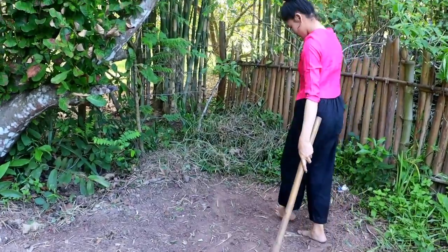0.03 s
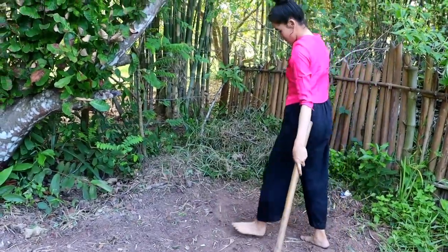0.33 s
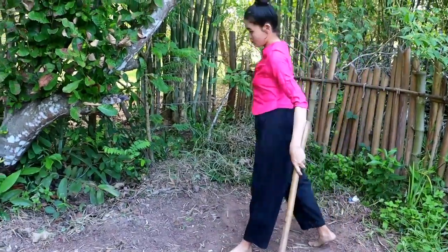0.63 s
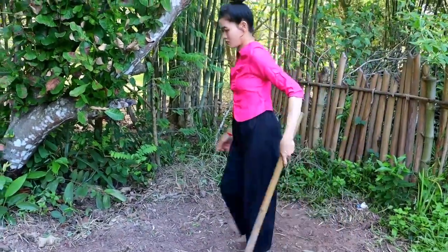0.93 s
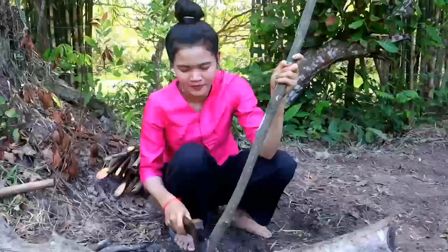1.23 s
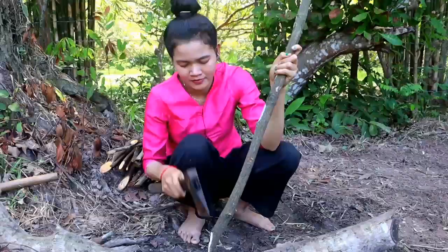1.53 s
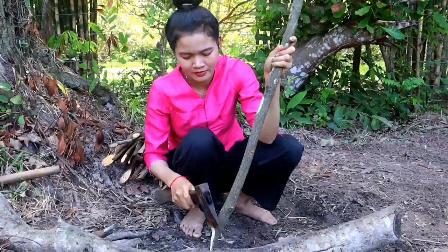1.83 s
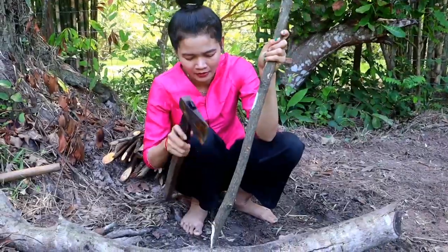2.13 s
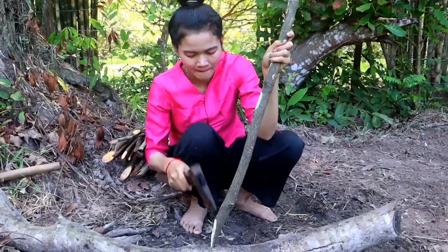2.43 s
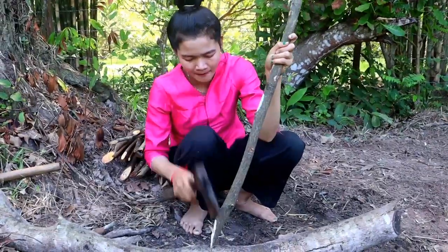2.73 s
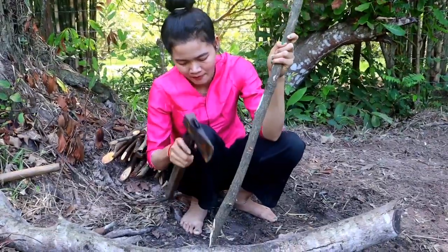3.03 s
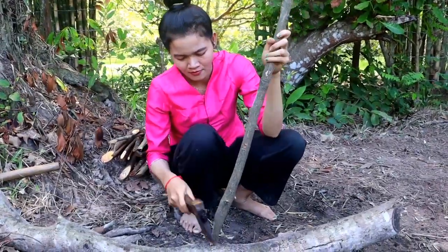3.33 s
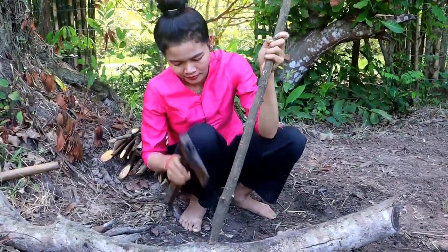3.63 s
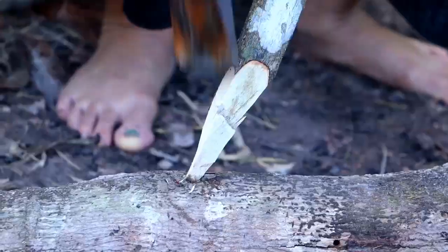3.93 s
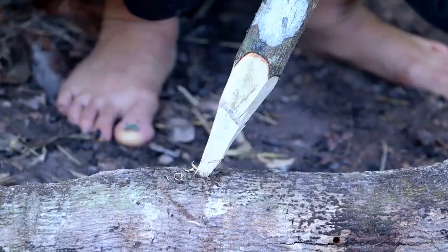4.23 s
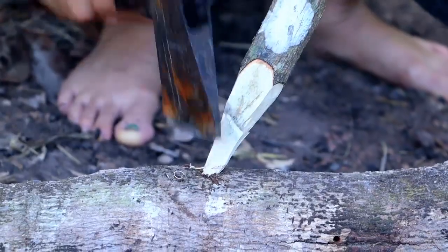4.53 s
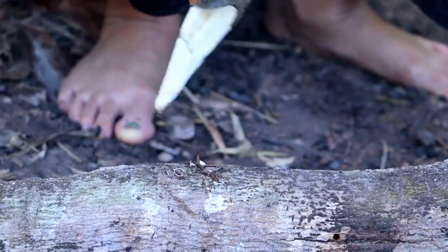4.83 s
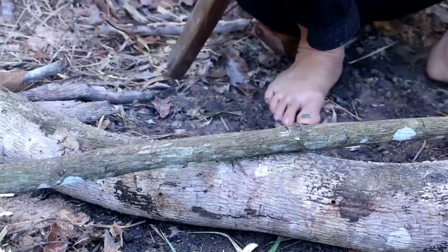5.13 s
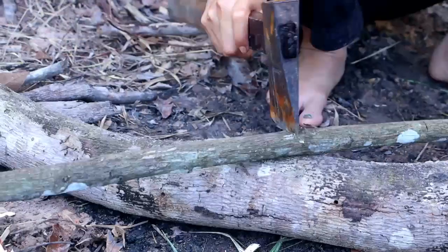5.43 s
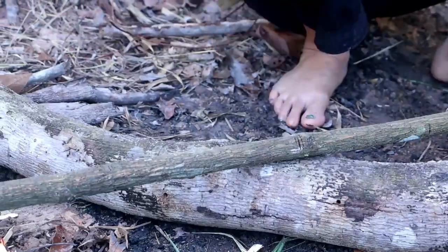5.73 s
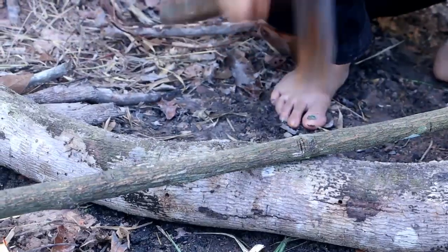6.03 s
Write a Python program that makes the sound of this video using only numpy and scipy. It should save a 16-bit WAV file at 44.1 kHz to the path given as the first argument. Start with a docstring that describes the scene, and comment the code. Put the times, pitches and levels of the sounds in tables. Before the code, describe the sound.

A hatchet chops a green stick against a log in regular sharp, thudding strokes, with faint birds and insects outdoors.

```python
"""A yard among trees: a hatchet points a green stake on a log, then chops a branch laid across it. Each stroke
tears fibres in a run of tiny fractures, rings the stick and thumps the log; chips patter into dry litter.
Between strokes the stick bumps, twigs crack and the blade is pulled free of the cut. Air rumbles, insects hiss,
far birds call through the trees. The sound drops out briefly three times."""
import sys
import numpy as np
from scipy import signal
from scipy.fft import rfft, irfft
from scipy.io import wavfile
from scipy.ndimage import uniform_filter1d

SR = 44100
rng = np.random.default_rng(int(sys.argv[2]) if len(sys.argv) > 2 else 0)


def dump_mix(stems):
    """Bounce the given channels to the path in sys.argv[1] as a 16-bit WAV at rate SR."""
    frames = np.atleast_2d(stems).T  # one column per channel
    limited = np.clip(frames, -1, 1)  # hard clip at full scale
    pcm = np.round(limited * 32767).astype(np.int16)
    wavfile.write(sys.argv[1], SR, pcm)


N = 276948

# dry litter and splinter spectrum: freq_hz, gain_db
LITTER_SPECTRUM = [(60, -17), (400, -8), (1200, 3.5), (3600, 1), (6500, -8.5), (9500, -8.5), (12500, -24),
                   (16000, -26)]


def gain_of(db):
    """Decibels to amplitude."""
    return 10 ** (np.asarray(db) / 20)


def unit_rms(x):
    """Scales to rms 1."""
    return x / np.sqrt(np.mean(x ** 2) + 1e-20)


def curve_at(points, hz):
    """Interpolates a table over log frequency."""
    freq_hz, value = np.transpose(points)
    return np.interp(np.log(hz + 1), np.log(freq_hz), value)


def add(mix, start_s, sound):
    """Mixes a sound in at start_s."""
    part = mix[max(round(start_s * SR), 0):][:len(sound)]
    part += sound[:len(part)]


def noise(spectrum, size):
    """Noise of rms 1; spectrum rows: freq_hz, gain_db."""
    hz = np.fft.rfftfreq(size, 1 / SR)
    return unit_rms(irfft(rfft(rng.standard_normal(size)) * gain_of(curve_at(spectrum, hz)), size))


def echoes(x, decay, strength, onset_s):
    """Scattered reflections; decay rows: freq_hz, t60_s; strength rows: freq_hz, gain_db."""
    hz, t, scatter = signal.stft(rng.choice([-1., 1.], SR // 2), SR, nperseg=256)
    envelope = gain_of(-60 * t / curve_at(decay, hz)[:, None]) * (1 - np.exp(-t / onset_s))
    band_energy = (envelope ** 2).sum(1, keepdims=True) * t[1] * SR
    envelope *= gain_of(curve_at(strength, hz))[:, None] / np.sqrt(band_energy)
    response = signal.istft(scatter * envelope, SR, nperseg=256)[1]
    return signal.fftconvolve(x, response)[:N]


def air():
    """Low rumble and leaf hiss, wavering slightly."""
    spectrum = [(12, -41), (25, -8), (52, 4.5), (80, -3.5), (130, -5), (220, -10.5), (330, -18),
                (480, -17.5), (800, -19.5), (2000, -24), (4300, -27), (6000, -29.5), (10000, -32),
                (15500, -36.5)]  # still air: freq_hz, gain_db
    contour = [(0, -47), (1.3, -47.5), (2.5, -47.5), (3.8, -47), (4, -49), (5.2, -47.5), (5.3, -47),
               (6.28, -47)]  # slow drift: time_s, level_db
    drift_db = np.interp(np.arange(N) / SR, *np.transpose(contour))
    swell_db = 0.87 * noise([(1, 3), (4, 7), (20, -42), (100, -105)], N)
    return noise(spectrum, N) * gain_of(drift_db + swell_db)


def insects():
    """Steady hiss in narrow bands."""
    bands = [(5000, 670, -65), (6970, 500, -71.5), (10940, 700, -71.5)]  # hiss: centre_hz, width_hz, level_db
    out = np.zeros(N)
    for hz, width_hz, db in bands:
        band = [(hz - 2 * width_hz, -45), (hz - width_hz / 2, -4), (hz, 0),
                (hz + width_hz / 2, -4), (hz + 2 * width_hz, -45)]
        out += gain_of(db) * noise(band, N)
    return out


def breeze():
    """Short, low puffs of air."""
    gusts = [(0.587, 0.11, -39), (0.762, 0.16, -49), (5.26, 0.06, -42.5)]  # puffs: start_s, length_s, level_db
    out = np.zeros(N)
    for start_s, length_s, db in gusts:
        puff = noise([(20, -29), (50, 15), (80, -23), (300, -58), (2000, -80)], SR)[:round(length_s * SR)]
        add(out, start_s, gain_of(db) * unit_rms(puff * np.hanning(len(puff))))
    return out


def bird_note(contour, waver, octave_db):
    """A gliding, slightly unsteady tone with its octave."""
    time_s, hz, db = np.transpose(contour)
    t = np.arange(time_s[0], time_s[-1], 1 / SR)
    wobble = noise([(20, -1), (150, -1.5), (600, -44)], SR)[:len(t)]
    phase = 2 * np.pi * np.cumsum(np.interp(t, time_s, hz) * (1 + waver * wobble)) / SR
    tone = unit_rms(np.sin(phase) + gain_of(octave_db) * np.sin(2 * phase))
    return tone * gain_of(np.interp(t, time_s, db)) * signal.windows.tukey(len(t), 0.15)


def birds():
    """Far chirps and a trill, scattered by the trees; a whistle and a hen come through more clearly."""
    # call contours: time_s, pitch_hz, gain_db
    falling_chirp = [(0, 5000, 4), (.016, 3676, -0.5), (.045, 2980, 4.5), (.08, 2253, -8)]
    trill = [(5.81, 1550, -50), (5.9, 1601, -53.5), (6.02, 1652, -56), (6.08, 1614, -49.5),
             (6.22, 1636, -51)]
    whistle = [(.8, 5750, -50), (.83, 5330, -56), (0.839, 4700, -48), (.9, 4700, -60), (.96, 4730, -75)]
    hen = [(0, 617, -46), (.04, 776, -49.5), (.07, 739, -51), (.09, 646, -49), (.14, 637, -49)]
    runs = [(0.048, 1.3, -61), (1.445, 3.8, -53.5), (4.92, 6.2, -59)]  # repeated chirps: start_s, end_s, gain_db
    period_s = 0.379
    far, clear = np.zeros((2, N))
    for start_s, end_s, db in runs:
        for chirp_s in np.arange(start_s, end_s, period_s):
            add(far, chirp_s, gain_of(db) * bird_note(falling_chirp, waver=0.0433, octave_db=-16))
    add(far, trill[0][0], bird_note(trill, waver=0.07, octave_db=-14.5))
    add(clear, whistle[0][0], bird_note(whistle, waver=0.0026, octave_db=-35))
    add(clear, hen[0][0], bird_note(hen, waver=0.01, octave_db=-6))
    scatter = echoes(far + gain_of(-4) * clear, decay=[(500, 0.11), (5000, 0.78)],
                     strength=[(500, -2), (5000, 0.63)], onset_s=0.0082)
    return gain_of(-0.5) * far + gain_of(-2.5) * clear + scatter


def click(spectrum, tilt_db_oct, chip_hz, chip_db, fizz_db=0, size=2048):
    """One fracture of energy 1: the material's spectrum, tilted, with one chip resonance."""
    hz = np.maximum(abs(np.fft.fftfreq(size, 1 / SR)), 1)
    db = curve_at(spectrum, hz) + tilt_db_oct * np.log2(np.maximum(hz, 250) / 1000)
    db += chip_db / (1 + (np.log2(hz / chip_hz) / 0.17) ** 2)
    db += fizz_db / (1 + (6000 / hz) ** 6)  # shelf above 6 kHz
    minimum_phase = np.exp(signal.hilbert(np.log(gain_of(db))).conj())
    wave = np.fft.ifft(minimum_phase).real
    return wave / np.linalg.norm(wave)


def crackle(body, length_s, fade_db, rate_hz, spread_db):
    """A fading run of tiny fractures of uneven size, each sounding the body."""
    t = np.arange(SR // 3) / SR
    fires = (rng.random(len(t)) < rate_hz / SR) | (t == 0)
    size = gain_of(spread_db * np.minimum(rng.exponential(1, len(t)), 3))
    sign = rng.choice([-1, 1], len(t))
    release = np.exp(-np.maximum(t - length_s, 0) / (0.00025 + 0.21 * length_s))
    force = gain_of(-fade_db * np.minimum(t / length_s, 1)) * release
    sound = signal.fftconvolve(fires * sign * size * force, body)
    return sound * np.linalg.norm(force) / np.linalg.norm(sound)


def litter(length_s, db, tilt_db_oct, pitch_hz, fade_db=7, rate_hz=1300):
    """A short crackle of dry twigs and leaves."""
    twig = click(LITTER_SPECTRUM, tilt_db_oct, pitch_hz, chip_db=9)
    return gain_of(db) * crackle(twig, length_s, fade_db, rate_hz, spread_db=1)


def stick_ring(pitch_ratio, damping):
    """The green stick rings in damped modes."""
    modes = [(496, 0.5, .05), (720, 5.5, 0.014), (979, 5.5, 0.039), (1364, 3.5, 0.042), (2026, 2.5, .036),
             (3900, -25, 0.028)]  # at pitch_ratio and damping 1: freq_hz, gain_db, t60_s
    t = np.arange(SR // 10) / SR
    return sum(gain_of(db - 60 * damping * t / t60_s) * np.cos(2 * np.pi * hz * pitch_ratio * t)
               for hz, db, t60_s in modes)


def handling():
    """Blunt bumps reach only the stick's lower modes; twigs crack, and the blade crackles as it is pulled out
    of the cut."""
    knocks = [(.994, -46, 0.92), (1.122, -42, 0.69), (1.764, -43, 0.37), (5.06, -38.5, 0.79),
              (5.487, -17, 0.4), (6.24, -27, 0.46)]  # stick bumps: start_s, gain_db, pitch_ratio
    cracks = [(.569, 0.0089, -40.5, 1380), (.794, 0.0039, -44, 2020), (1.018, .0054, -39, 3500),
              (2.137, 0.0021, -33.5, 2210), (2.614, 0.0072, -36, 1620), (2.672, 0.012, -44, 4240),
              (3.543, 0.005, -27, 3200), (3.548, 0.03, -37, 4040), (3.584, 0.0012, -25, 3270),
              (4.005, 0.0025, -25, 4060), (4.855, 0.023, -48.5, 3290), (6.256, 0.011, -35, 4970)]  # twigs cracking, and the blade pulled free of the cut (2.137, 2.614, 3.543 s): start_s, length_s, level_db, pitch_hz
    out = np.zeros(N)
    for start_s, db, pitch_ratio in knocks:
        ring = signal.lfilter(*signal.butter(3, 900, fs=SR), stick_ring(pitch_ratio, damping=0.57))
        add(out, start_s, 2 * gain_of(db) * ring / abs(ring).max())
    for start_s, length_s, db, hz in cracks:
        add(out, start_s, litter(length_s, db, tilt_db_oct=1, pitch_hz=hz))
    return out


def log_thump(force_db, tilt_db_oct, pitch_ratio, size=16384):
    """Bending waves carry treble faster than bass: the blow sweeps down to a thud, then the log rings."""
    # the log at pitch_ratio 1
    thud = [(30, -1), (60, 26), (95, 39.5), (130, 37), (160, 34), (205, 40.5), (260, 32), (330, 25.5),
            (480, 29), (650, 26), (850, 16), (1500, 10), (4000, -25), (15000, -32)]  # impact spectrum: freq_hz, gain_db
    bending = [(60, 0.01302), (130, 0.014), (200, 0.0089), (350, 0.0052), (600, 0.00344), (1200, 0.0013),
               (4000, 0.0012)]  # wave arrival: freq_hz, delay_s
    modes = [(98.7, -33, 0.43), (130.7, -31, 0.2), (230, -37, 0.18), (280.7, -25.5, 0.13), (391, -33, 0.12),
             (500, -53, 0.11)]  # ringing: freq_hz, gain_db, t60_s
    hz = np.fft.rfftfreq(size, 1 / SR)
    t = np.arange(size) / SR
    ring = sum(gain_of(db - 60 * t / t60_s) * np.sin(2 * np.pi * (f_hz * pitch_ratio * t + rng.random()))
               for f_hz, db, t60_s in modes)
    spectrum = gain_of(curve_at(thud, hz / pitch_ratio)) + rfft(ring * (1 - np.exp(-t / 0.009)))
    lag_turns = np.cumsum(curve_at(bending, hz / pitch_ratio) / pitch_ratio) * SR / size
    force = gain_of(force_db + tilt_db_oct * np.log2(np.maximum(hz, 100) / 200))
    return irfft(force * spectrum * np.exp(-2j * np.pi * lag_turns))[:-size // 8]


def landing(force_db, tilt_db_oct, pitch_ratio, chips_db, shower_s, shower_hz):
    """The blow reaches the log, the stick rebounds and lands again, chips patter down."""
    rebound_s, rebound_db, fall_s = 0.0098, -21.5, 0.044
    out = np.zeros(SR // 2)
    add(out, 0, log_thump(force_db, tilt_db_oct, pitch_ratio))
    add(out, rebound_s, log_thump(force_db + rebound_db, tilt_db_oct, pitch_ratio))
    chips = litter(shower_s, chips_db, tilt_db_oct=-0.3, pitch_hz=shower_hz, fade_db=9.5, rate_hz=470)
    add(out, fall_s, chips)
    return out


def cut(db, chip_hz, stick_ratio, length_s, tilt_db_oct, fizz_db, fade_db=0):
    """Fibres part under the edge and ring the damp stick; loosened splinters crackle on."""
    ring = stick_ring(stick_ratio, damping=1.7)
    fibres = [(50, -15), (200, 1), (550, 0), (1400, -1.5), (2600, -4), (4200, -6.5), (6500, -19),
              (8000, -14.5), (10500, -17.5), (12500, -28), (16000, -32)]  # tearing spectrum: freq_hz, gain_db
    fracture = click(fibres, tilt_db_oct, chip_hz, chip_db=10, fizz_db=fizz_db)
    body = signal.fftconvolve(fracture, signal.unit_impulse(len(ring)) + gain_of(-35) * ring)
    tear = crackle(body, length_s, fade_db, rate_hz=7000, spread_db=2.5)
    splinter = click(LITTER_SPECTRUM, tilt_db_oct=-2.7, chip_hz=5840, chip_db=8.5)
    splinters = crackle(splinter, length_s=0.04, fade_db=19, rate_hz=2200, spread_db=-0.5)
    add(tear, length_s, gain_of(-19.5) * splinters)
    return gain_of(db) * tear


def slanting_strokes():
    """The edge enters the stake, hisses along the grain, snaps the chip off and hits the log."""
    # strokes: start_s, slice_s, entry_db, entry_hz, slice_db, slice_db_oct, snap_db, snap_hz,
    # snap_fizz_db, stick_ratio, force_db, thud_db_oct, log_ratio, chips_db
    strokes = [(1.4949, 0.015, -10.5, 2120, -19, 1.8, -12.5, 4300, 2, 0.99, -0.5, 1.5, 0.98, -53),
               (1.973, 0.0089, -20, 1150, -21.5, 0.1, -19.5, 4430, 5.5, 1.04, -15.5, 0.5, 1.09, -47),
               (2.4435, 0.01, -16.5, 1300, -15, 0.7, -15.5, 1940, -9, 0.98, -13.5, -3, 1.1, -62),
               (2.9207, 0.0062, -9.5, 1480, -16.5, 0.6, -16, 3900, -8, 1.02, -12, 0, 1.06, -46),
               (3.3835, .030, -22, 700, -18.5, 0.84, -25, 2100, -18, 0.99, 1, -1.1, 1.01, -42),
               (4.138, 0.019, -18, 2350, -27.5, -3.5, -13, 615, -13, 1.14, 2, 2, 0.99, -50),
               (4.572, .016, -28, 830, -31, -1.5, -10.5, 2720, -5.5, 1.063, -0.7, 0.2, 0.94, -63)]
    slice_delay_s, slice_hz = 0.004, 3830
    out = np.zeros(N)
    for (start_s, slice_s, entry_db, entry_hz, slice_db, slice_db_oct,
         snap_db, snap_hz, fizz_db, stick_ratio, *blow) in strokes:
        entry = cut(entry_db, entry_hz, stick_ratio, length_s=0.0045, tilt_db_oct=-0.4, fizz_db=-3)
        hiss = cut(slice_db, slice_hz, stick_ratio, slice_s, slice_db_oct, fizz_db=6.5, fade_db=10.5)
        snap = cut(snap_db, snap_hz, stick_ratio * 1.059,
                   length_s=0.0031, tilt_db_oct=1.5, fizz_db=fizz_db)
        add(out, start_s, entry)
        add(out, start_s + slice_delay_s, hiss)
        add(out, start_s + slice_s, snap)
        add(out, start_s + slice_s, landing(*blow, shower_s=0.048, shower_hz=4900))
    return out


def square_chops():
    """The edge bites and thumps at once; the branch kicks back against the blade."""
    # blows: start_s, bite_s, bite_db, chip_hz, kick_db, force_db, thud_db_oct, log_ratio, chips_db
    chops = [(5.4658, 0.0052, -11, 974, -31.5, 1.5, 0.7, 1.16, -46),
             (5.556, 0.018, -36, 3900, -42, -10, -2, 1.06, -48.5),
             (6.2, .0075, -11.5, 5150, -20, 3.5, 1.5, 1.149, -43)]
    stick_ratio, kick_delay_s, kick_hz = 0.892, 0.024, 2260
    out = np.zeros(N)
    for start_s, bite_s, bite_db, chip_hz, kick_db, *blow in chops:
        bite = cut(bite_db, chip_hz, stick_ratio, bite_s, tilt_db_oct=0, fizz_db=6.5, fade_db=0.5)
        add(out, start_s, bite)
        add(out, start_s, landing(*blow, shower_s=0.17, shower_hz=8100))
        kick = cut(kick_db, kick_hz, stick_ratio, length_s=0.01, tilt_db_oct=-5, fizz_db=-1, fade_db=4)
        add(out, start_s + kick_delay_s, kick)
    return out


def chopping():
    """The work, with quick echoes off ground and woodpile and a faint tail from the trees."""
    yard_decay = [(80, 0.29), (300, -0.23), (1000, 0.8), (3500, 0.36), (12000, 0.3)]  # tail decay: freq_hz, t60_s (negative swells)
    yard_strength = [(80, -4), (300, -23.5), (1000, -32.5), (3500, -23.5), (12000, -18)]  # tail spectrum: freq_hz, gain_db
    direct = slanting_strokes() + square_chops() + handling()
    near = echoes(direct, decay=[(100, 0.049), (1000, 0.062), (10000, 0.088)],
                  strength=[(100, -23), (600, -11), (10000, -23.5)], onset_s=0.0076)
    return direct + near + echoes(direct, yard_decay, yard_strength, onset_s=0.005)


def scene():
    """Chopping close by, the yard around it; mono."""
    return (chopping() + birds() + air() + insects() + breeze())[None]


def record(dry):
    """Brief dropouts, clipping at full scale, low-pass."""
    dropouts = [(1.333, 1.373), (3.863, 3.893), (5.208, 5.251)]  # gaps: start_s, end_s
    dropout_db, cutoff_hz = -35, 15750
    t = np.arange(N) / SR
    muted = sum((t > start_s) & (t < end_s) for start_s, end_s in dropouts)
    gate = gain_of(dropout_db * uniform_filter1d(muted.astype(float), size=60))
    clipped = np.clip(dry * gate, -1, 1)
    lowpass = signal.firwin(301, cutoff_hz, window=("kaiser", 8), fs=SR)
    return signal.oaconvolve(clipped, lowpass[None], "same")


dry = scene()
out = record(dry)
dump_mix(out)
```